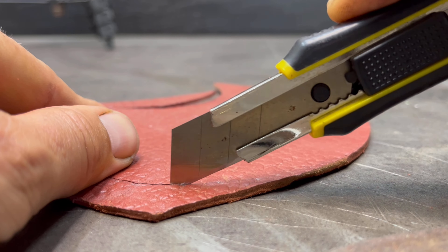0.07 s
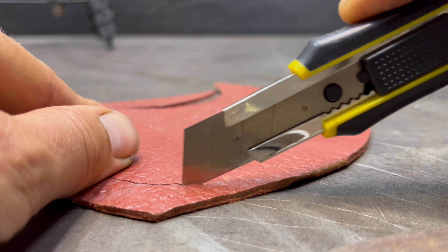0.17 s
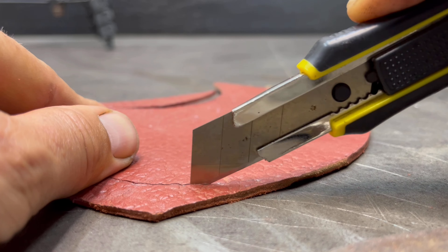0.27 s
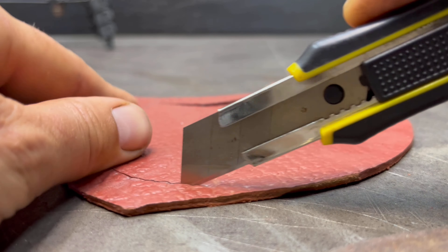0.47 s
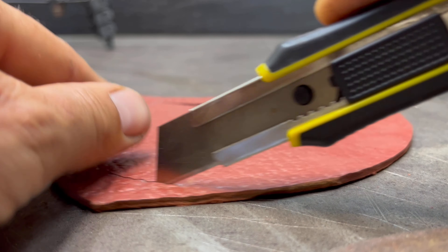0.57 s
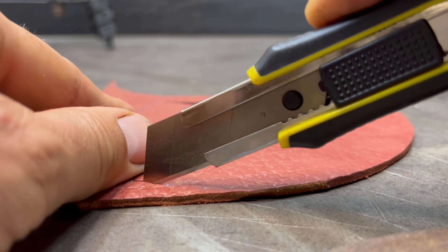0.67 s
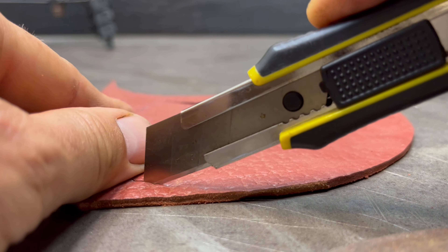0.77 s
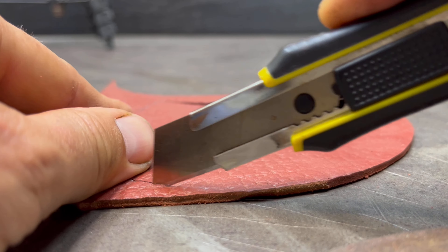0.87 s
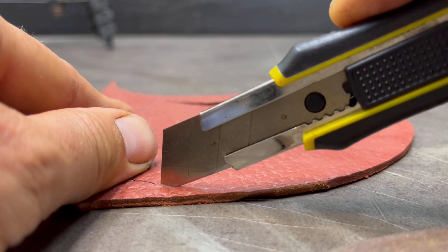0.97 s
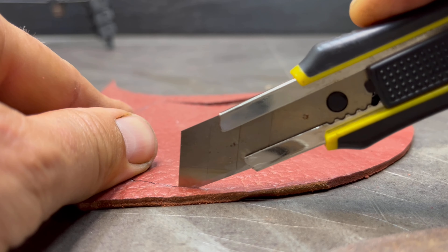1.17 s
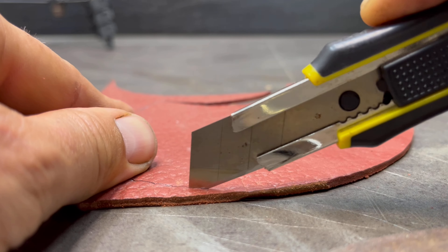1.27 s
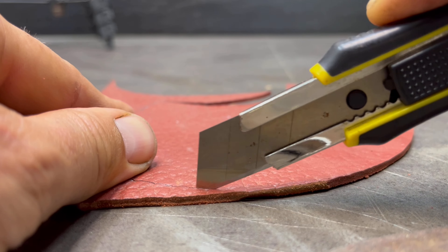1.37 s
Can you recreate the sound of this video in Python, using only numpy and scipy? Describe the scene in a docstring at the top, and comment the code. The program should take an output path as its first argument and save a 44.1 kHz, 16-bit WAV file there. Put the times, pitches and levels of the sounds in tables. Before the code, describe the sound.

A utility knife cuts thick leather in short, rasping pulls over a softly rumbling board. One longer hissing slice with a tiny squeak follows, then a sharp click and more pulls, heard close up in a quiet workshop.

```python
"""Short, rasping pulls of a utility knife through thick leather are heard first, over a rumbling board.
Tearing fibres drive the resonances of knife and board, and the board thuds as it gives way. The blade
ticks, squeaks by stick-slip and crunches into one long, hissing slice. It snaps through the edge with
a sharp click, and the short pulls go on. Two microphone ports, close by in a quiet workshop, receive
the cut with differences of phase and level."""
import sys
import numpy as np
from scipy import signal
from scipy.fft import rfft, irfft, next_fast_len
from scipy.io import wavfile

SR = 44100
rng = np.random.default_rng(int(sys.argv[2]) if len(sys.argv) > 2 else 0)


def unload_wav(signal):
    """Save mono or channel-first audio to the path in sys.argv[1] as 16-bit WAV at rate SR, clipped to [-1, 1]."""
    wavfile.write(
        sys.argv[1],
        SR,
        np.round(np.clip(np.atleast_2d(signal).T, -1, 1) * 32767).astype(np.int16),
    )


N = 61739
FFT_SIZE = 2 * next_fast_len(N // 2 + SR // 8, True)  # leaves room for tails
TIME, FREQ = np.arange(N) / SR, np.arange(FFT_SIZE // 2 + 1) * SR / FFT_SIZE + 1e-6
TOP_HZ = 15900

# short pulls: t/s, length/s, rasp level/dB, peak position/fraction, rumble level/dB, low-mode gain/dB
BLADE_PULLS = [(0.0, 0.15, -73.5, 0.7, -67, 0), (.15, 0.14, -58.5, 0.55, -53, -4.5),
               (0.246, 0.019, -60.5, 0.82, -61, -2.5), (0.274, 0.08, -75.5, 0.18, -62.5, -1),
               (0.344, 0.059, -67.5, 0.38, -68, -6.5), (0.701, 0.073, -64, 0.65, -67.5, 0),
               (0.827, 0.08, -63.5, 0.27, -70, 5), (0.863, .16, -57, 0.66, -56.5, 2.5),
               (1.055, 0.13, -56, 0.46, -50.5, 0.5), (1.23, .13, -61, 0.41, -53.5, 2.5),
               (1.348, 0.086, -65, 0.47, -58.5, 0.5)]
# resonances of knife and board: f/Hz, bandwidth/Hz, gain when dragged/dB, gain when struck/dB
KNIFE_MODES = [(200, 200, -13, -10), (560, 230, -11, -10.5), (1473, 180, 5.5, 6.5), (2046, 180, -20, -3),
               (2390, 350, -20, -1.5), (3038, 213, -0.5, -1), (3560, 390, -6, -25), (4590, 390, -13, 2),
               (6400, 820, -10, -3), (7385, 270, -5.5, -4), (7930, 350, -25, -3.5), (8930, 350, -15.5, 0),
               (9940, 370, -10, 0.5), (11360, 400, -14, -12.5), (11960, 450, -5.5, -7.5)]
# the board giving way: t/s, f/Hz, level/dB, decay time/s
BOARD_THUDS = [(.07, 58.6, -46.5, 0.022), (0.217, 65, -43, 0.037), (.385, 255.1, -55, .035),
               (0.552, 106, -45, 0.013), (.749, 230, -43.5, 0.0055), (.7488, 722, -42, 0.0021),
               (.785, 64, -45.5, .018), (.834, 170, -42, 0.0066), (1.094, 135.7, -45.5, 0.032)]
# stick-slip of the blade: t/s, f/Hz, level/dB, length/s
BLADE_SQUEAKS = [(.2945, 914, -56.5, .011), (0.4851, 1351, -31.5, 0.0097), (0.5498, 1399, -47, 0.008)]
# ticks of the blade and its holder: t/s, level/dB, cut-off f/Hz, decay time/s
BLADE_TICKS = [(.296, -48, 1280, .004), (0.4157, -52.5, 14000, 0.00044), (0.427, -44.5, 5000, 0.0011),
               (0.4762, -40, 5000, 0.0011), (0.5468, -42, 3000, .004), (.7484, -32, 4470, .0013),
               (.7595, -46, 5000, 0.0013), (0.8285, -33, 12000, .002)]
# leather crunching under the blade: t/s, length/s, level/dB
LEATHER_CRUNCHES = [(0.407, 0.05, -60.5), (0.453, 0.062, -58.5), (.658, .038, -53.5), (.705, .055, -62.5)]
# envelope of the long slice: t/s, level/dB
SLICE_ENVELOPE = [(0.412, -86), (.435, -68), (0.454, -52.5), (0.496, -46.5), (.53, -53.5), (.567, -57),
                  (.62, -56.5), (.65, -55), (0.678, -53), (.712, -72.5)]
# noise spectra of board, crunch, slice and room: f/Hz, relative level/dB
BOARD_SPECTRUM = [(20, -26.5), (35, -11.5), (55, -0.5), (130, -4.5), (260, -10.5), (360, -18.5), (700, -29),
                  (1300, -54), (3000, -75.5)]
CRUNCH_SPECTRUM = [(100, -9.5), (250, -2), (450, -0.5), (800, -5.5), (1100, -17), (2000, -23.5),
                   (4300, -11), (6000, -34), (15000, -50)]
SLICE_SPECTRUM = [(300, -4), (800, -5), (1400, -3.5), (1850, -7), (2300, -5.5), (3300, -3.5), (4500, -3.5),
                  (5700, -8.5), (8000, -8.5), (11000, -7), (13000, -8), (15500, -10)]
ROOM_SPECTRUM = [(20, -20.5), (35, -12), (55, 1), (100, -14.5), (250, -20.5), (500, -34), (1400, -37),
                 (2200, -51.5), (3300, -47), (15000, -53.5)]
# paths to the two ports: f/Hz, phase lead of left/rad, coherence/fraction, left minus right level/dB
PORT_PATHS = [(80, 0.06, 0.98, 0.5), (700, 0.86, 0.63, -0.5), (1450, -1.0, 0.6, -3.5),
              (2200, -0.5, 0.67, 2.5), (3100, 1.38, 1, 1.7), (4500, 0.88, 0.1, 5), (5700, 0.2, 0.4, -2.5),
              (6760, -1.03, 0.5, 1.9), (8480, -3.5, 1, -1), (9800, -5, 0.6, 0), (11200, -6, 1, -1.7),
              (12000, -7, 0.3, -0.2), (15300, -9.4, 0.7, 0.1)]


def undb(db):
    """Amplitude ratio of a level in decibels."""
    return 10 ** (np.asarray(db) / 20)


def unit(x):
    """Normalisation to an rms of 1."""
    return x / np.sqrt(np.mean(x ** 2))


def filtered(x, response):
    """Linear filtering multiplies the spectrum by a frequency response."""
    return irfft(rfft(x, FFT_SIZE) * response)[..., :N]


def over_hz(table, column=1):
    """Interpolation of a table column over log frequency."""
    columns = np.array(table, float).T
    return np.interp(np.log(FREQ), np.log(columns[0]), columns[column])


def low_pass(hz):
    """A two-pole response falls 12 dB per octave above its cut-off."""
    s = 1j * FREQ / hz
    return 1 / (1 + np.sqrt(2) * s + s * s)


def unit_power(response):
    """Power normalisation: unit white noise emerges with unit power below TOP_HZ."""
    return response / np.sqrt(np.mean(abs(response) ** 2 * (FREQ < TOP_HZ)))


def wander(hz):
    """Low-passed noise gives a smooth random fluctuation of unit rms."""
    return unit(filtered(rng.standard_normal(N), 1 / (1 + (FREQ / hz) ** 2) ** 2))


def arch(start, length, peak):
    """An envelope of two quarter sines, meeting at the fraction `peak` of its length."""
    return np.sin(np.pi / 2 * np.interp(TIME, [start, start + length * peak, start + length], [0, 1, 0]))


def ports(common, opposed, coherence_scale=1, left_db=0):
    """Partial coherence: two ports share one signal and take a second with opposite signs."""
    lead, coherence, balance_db = (over_hz(PORT_PATHS, column) for column in (1, 2, 3))
    coherence = np.clip(coherence * coherence_scale, 0, 1)
    side = np.array([[1], [-1]])
    path = np.exp(side * 1j * lead / 2) * undb(side * (balance_db + left_db) / 2)
    shared = filtered(common, path * np.sqrt((1 + coherence) / 2))
    return shared + filtered(opposed, side * path * np.sqrt((1 - coherence) / 2))


def rumble(envelope, spectrum):
    """Random vibration is heard as coloured noise under an amplitude envelope."""
    streams = [unit(filtered(rng.standard_normal(N), undb(over_hz(spectrum)))) for _ in range(2)]
    return ports(*(envelope * np.array(streams)))


def knife_response(struck):
    """Modal superposition: the resonances of knife and board add to a direct, non-resonant share."""
    response = undb(-24.5 if struck else -16.5)
    for hz, width, drag_db, strike_db in KNIFE_MODES:
        detuning = (FREQ ** 2 - hz ** 2) / (FREQ * width)
        response = response + undb(strike_db if struck else drag_db) / (1 + 1j * detuning)
    return response


def fibres(judder_db, judder_hz, snaps_per_s=7000, spread_db=3.0, rub_gain=0.48):
    """Shot noise of snapping fibres over smooth rubbing, in two streams modulated by blade judder."""
    sizes = undb(spread_db * np.minimum(rng.exponential(size=(2, N)), 5))
    snaps = (rng.random((2, N)) < snaps_per_s / SR) * rng.choice([-1, 1], (2, N)) * sizes
    rubbing = rub_gain * rng.standard_normal((2, N))
    return unit(unit(snaps) + rubbing) * undb(judder_db * wander(judder_hz))


def pulls(crossover_hz=2700):
    """Forced vibration: each short pull tears fibres, ringing the knife and shaking the board."""
    high_level = low_level = shake = 0
    for start, length, db, peak, rumble_db, low_db in BLADE_PULLS:
        shape = arch(start, length, peak)
        rasp = undb(db) * shape ** 1.15
        high_level += rasp
        low_level += rasp * undb(low_db)
        shake += undb(rumble_db) * shape ** 0.87
    response = unit_power(knife_response(struck=False) * low_pass(13500))
    low_share = 1 / (1 + (FREQ / crossover_hz) ** 8)
    tearing = fibres(judder_db=1.93, judder_hz=170)
    high_modes = filtered(high_level * tearing, response * (1 - low_share))
    low_modes = filtered(low_level * tearing, response * low_share)
    return ports(*(high_modes + low_modes)) + rumble(shake, BOARD_SPECTRUM)


def thuds():
    """Damped free oscillation: the board swings as it gives way under the blade."""
    swings = 0
    for start, hz, db, decay in BOARD_THUDS:
        age = np.maximum(TIME - start, 0)
        envelope = np.exp(-age / decay) * (1 - np.exp(-2 * hz * age))
        swings += undb(db) * envelope * np.sin(2 * np.pi * hz * age)
    return swings


def squeaks(jitter=0.03, overtone_db=-34):
    """Stick-slip friction: the blade catches and slides for a few nearly pure cycles."""
    tones = 0
    for start, hz, db, length in BLADE_SQUEAKS:
        phase = 2 * np.pi * np.cumsum(hz * (1 + jitter * wander(hz=380))) / SR
        tone = np.sin(phase) + undb(overtone_db) * np.sin(2 * phase)
        tones += undb(db) * arch(start, length, peak=0.18) * tone
    return ports(tones, np.zeros(N))


def impact(start, db, cutoff_hz, decay_s, scrape, rise_s=0.0002):
    """Impulse excitation: a sharp push and a brief scrape set the knife's modes ringing."""
    age = TIME - start
    envelope = np.exp(-abs(age) / np.where(age < 0, rise_s, decay_s))
    force = scrape * envelope * rng.standard_normal((2, N))
    force[0, int(start * SR)] += 1  # the push
    spectrum = rfft(force, FFT_SIZE)
    whitened = spectrum / (abs(spectrum) + 0.7 * np.mean(abs(spectrum)))
    ring = irfft(whitened * knife_response(struck=True) * low_pass(cutoff_hz))[:, :N]
    return ring * undb(db) / np.sqrt(np.sum(ring[0] ** 2) / 12)  # energy of 12 samples at level db


def clicks():
    """Impact transients: light ticks of the blade, and the loud snap as it breaks through the edge."""
    ticks = sum(impact(*tick, scrape=0.82) for tick in BLADE_TICKS)
    snap = impact(start=0.8331, db=-12.5, cutoff_hz=11100, decay_s=0.0014, scrape=0.41)
    return ports(*(ticks + snap), coherence_scale=1.11, left_db=0.2)


def crunches():
    """Fibre fracture gives coarse, low noise where the blade bites and where it binds."""
    envelope = sum(undb(db) * arch(start, length, peak=0.46) for start, length, db in LEATHER_CRUNCHES)
    tearing = envelope * fibres(judder_db=2.5, judder_hz=222)
    return ports(*filtered(tearing, unit_power(undb(over_hz(CRUNCH_SPECTRUM)))), left_db=1)


def long_slice():
    """Damping: deep in the leather the knife's resonances are subdued, so the cut hisses broadly."""
    times, levels_db = np.array(SLICE_ENVELOPE).T
    envelope = undb(np.interp(TIME, times, levels_db, left=-200, right=-200))
    shake = undb(-62) * (envelope / envelope.max()) ** 0.45
    tearing = envelope * fibres(judder_db=1.26, judder_hz=196)
    hiss = filtered(tearing, unit_power(undb(over_hz(SLICE_SPECTRUM))))
    return ports(*hiss, coherence_scale=0.95, left_db=1) + rumble(shake, BOARD_SPECTRUM)


def room(direct, wet_db, t60_s):
    """Reverberation: the workshop's reflections add a dull, exponentially decaying tail."""
    tail = rng.standard_normal((2, N)) * np.exp(-np.log(1000) * TIME / t60_s)
    tail /= np.sqrt(np.sum(tail ** 2) / 2)
    return direct + undb(wet_db) * filtered(direct, rfft(tail, FFT_SIZE) * low_pass(7000))


def scene():
    """Superposition: the sounds of the cut add to their reflections and to steady room noise."""
    cut = pulls() + long_slice() + crunches() + clicks() + squeaks() + thuds()
    return room(cut, wet_db=-20.5, t60_s=0.09) + rumble(undb(-60), ROOM_SPECTRUM)


def record(dry):
    """Band limiting: a steep elliptic low-pass removes the treble above TOP_HZ."""
    return signal.sosfilt(signal.ellip(8, .2, 70, TOP_HZ, fs=SR, output="sos"), dry)


dry = scene()
out = record(dry)
unload_wav(out)
```